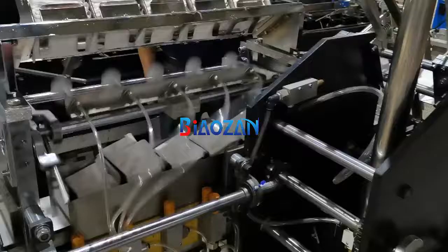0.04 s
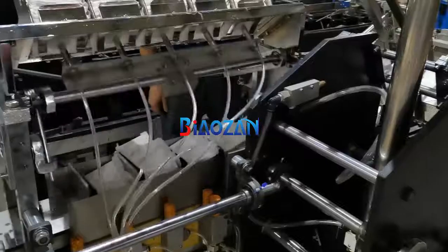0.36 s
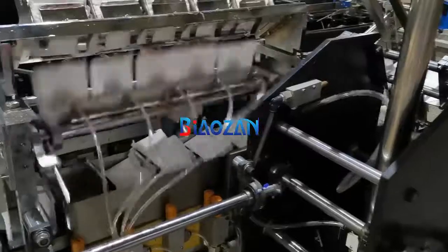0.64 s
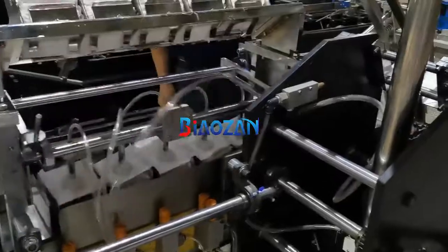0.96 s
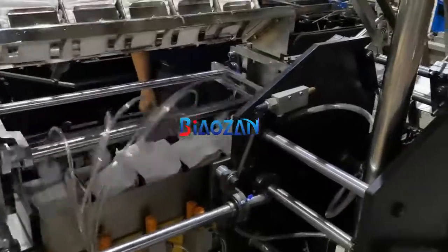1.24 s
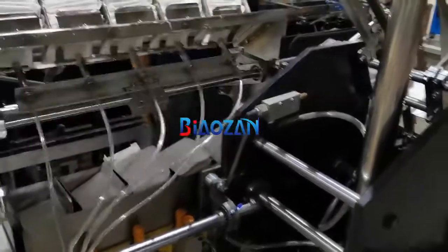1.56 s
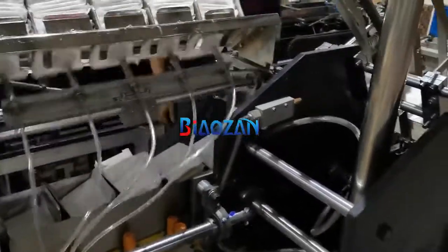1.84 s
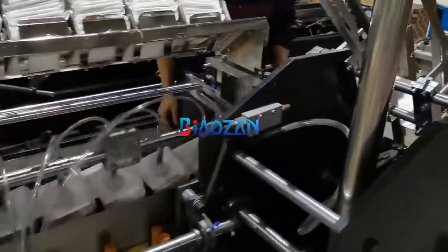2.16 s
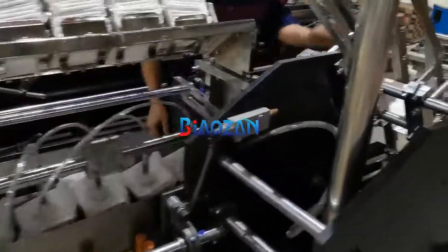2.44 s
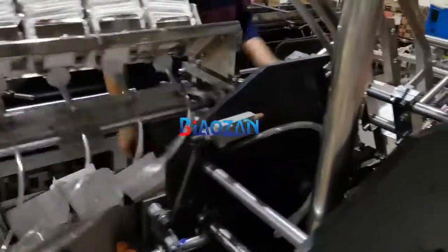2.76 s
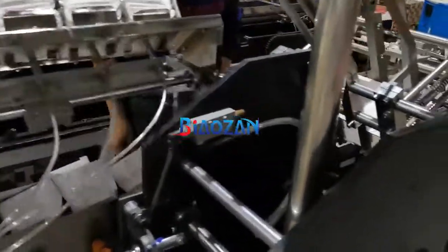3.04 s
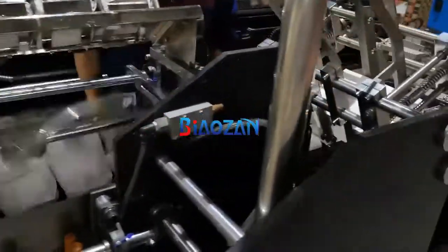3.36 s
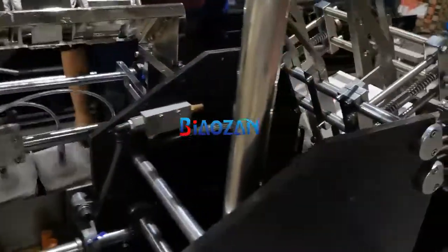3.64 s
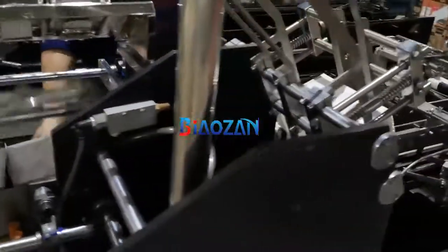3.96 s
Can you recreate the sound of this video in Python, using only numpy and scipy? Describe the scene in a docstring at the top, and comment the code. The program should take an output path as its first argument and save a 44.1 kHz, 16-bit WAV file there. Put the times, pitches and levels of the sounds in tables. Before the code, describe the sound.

A factory machine's air nozzle hisses loudly three times, with knocks and steady rumbling.

```python
"""In a workshop, a machine that packs cartons runs close by. Each time its suction arm grabs, a valve
knocks and a vacuum ejector (a nozzle that makes suction from a jet of air) opens on the right. It spits,
sags, then swells to a ringing hiss over a lower roar. All the while air leaks and the drive rumbles and
clatters. An automatic gain control turns everything down during each burst."""
import sys
import numpy as np
from scipy import signal
from scipy.fft import rfft, irfft
from scipy.io import wavfile
from scipy.ndimage import uniform_filter1d

SR = 44100
rng = np.random.default_rng(int(sys.argv[2]) if len(sys.argv) > 2 else 0)


def store_pcm(level_fs):
    """Save levels as 16-bit WAV."""
    pcm = np.round(np.clip(level_fs, -1, 1) * 32767).astype(np.int16)
    wavfile.write(sys.argv[1], SR, np.atleast_2d(pcm).T)


N = 176400

# Tone colour of each noise: pitch_hz, left_db, right_db
SHOP_SPECTRUM = [(1050, -87, -89.5), (2220, -78, -71.5), (2760, -82, -73.5), (4340, -72, -74),
                 (4760, -78, -68), (5480, -72, -74.5)]
DRIVE_SPECTRUM = [(20, -75, -86), (32.2, -74.5, -73), (48.5, -71, -70), (74.6, -77.5, -77.5),
                  (120, -74, -75.5), (197, -75.5, -74.5), (303, -72.5, -74), (520, -82.5, -74),
                  (667, -85, -78), (890, -85, -75.5), (1260, -82.5, -77.5), (1660, -93, -89)]
LEAK_SPECTRUM = [(6390, -86, -77.5), (7310, -81, -72.5), (8300, -80, -77), (9500, -77, -70),
                 (9900, -86, -70), (10600, -77, -62.5), (11000, -87, -66.5), (11900, -102, -79),
                 (12500, -81, -69.5), (13400, -87, -69.5), (14100, -89, -79), (14800, -90, -78),
                 (15600, -87, -78)]
SPIT_SPECTRUM = [(6850, -80, -79), (8000, -75, -67), (9150, -66, -57), (9900, -76, -64), (11300, -75, -52),
                 (12800, -76, -58.5), (14000, -78, -65)]
JET_SPECTRUM = [(4670, -73, -71.5), (5920, -78.5, -75.5), (6740, -79, -67), (8600, -71, -78),
                (9400, -78, -80), (14550, -80, -67), (17100, -69, -55)]
ROAR_SPECTRUM = [(636, -86, -86.5), (1000, -76, -73.5), (1330, -73, -70), (1680, -75, -72.5),
                 (2310, -69.5, -63.5), (2840, -64, -61), (3360, -67, -66), (3900, -63.5, -64),
                 (4640, -69.5, -70), (5900, -73, -73.5)]
# How alike a noise is in both ears: pitch_hz, likeness_0_to_1
EAR_LIKENESS = [(100, 1), (300, 1), (600, 0.69), (1300, 0.59), (3000, 0.42), (5000, 0.06)]
# Steady ringing in the workshop noise: pitch_hz, width_hz, left_db, right_db
SHOP_RINGS = [(455.6, 11.7, -67.5, -72.5), (907, 59, -72, -72), (3160, 230, -70, -69.5),
              (3770, 400, -72, -75.5)]
# How the leak's hiss rises and falls: time_s, level_db
LEAK_LEVELS = [(.1, 4), (.28, 4.5), (1.25, 2), (1.37, 2.5), (1.409, 4.5), (1.48, 2), (1.65, 2.5),
               (2.49, 1.5), (2.9, 3.5), (3.901, 1.5)]
# Thin whistles of the leak: start_s, end_s, pitch_hz, width_hz, left_db, right_db
LEAK_RINGS = [(.06, .33, 12900, 170, -72, -49.5), (.07, .29, 9720, 200, -76, -60),
              (.07, .29, 10600, 450, -78, -60.5), (.07, .33, 3900, 160, -65, -63.5),
              (1.3, 1.68, 9300, 221, -69, -67), (1.25, 1.68, 12800, 450, -82, -70),
              (2.5, 2.93, 13350, 276, -84, -66), (2.5, 2.87, 3210, 170, -67.5, -65.5)]
# Dull clunks of the swinging arm: start_s, pitch_hz, level_db
ARM_CLUNKS = [(1.529, 417, -30), (1.557, 300, -32.5), (2.68, 686, -36), (3.555, 340, -31), (3.875, 85, -35)]
# Knocks of the valve and arm: start_s, thud_db, clack_db
KNOCK_HITS = [(.295, 2.5, 3.5), (1.178, -2, -3.5), (1.397, 0, 0.5), (1.684, 3, 3), (2.419, -1, -4),
              (2.935, 2.5, 0.5), (3.819, 0, -4)]
# Notes of the struck frame: pitch_hz, level_db, ring_s (time to fade by 60 dB)
FRAME_NOTES = [(60, -39, .05), (117, -24, 0.032), (168, -34, 0.028), (275, -36.5, 0.041), (402, -34, 0.043),
               (624, -34, 0.015), (957, -32, 0.021), (1250, -30.5, 0.0088), (2018, -35.5, 0.019)]
# Hollow notes in the roar that come and go: start_s, end_s, pitch_hz, width_hz, left_db, right_db
ROAR_RINGS = [(.49, 1.17, 2650, 280, -60, -55), (.55, .8, 3610, 450, -61, -59),
              (.8, 1.17, 3100, 380, -58.5, -61), (.6, 1.17, 1020, 150, -67, -64.5),
              (1.81, 2.41, 3290, 450, -60.5, -56), (3.15, 3.5, 3820, 550, -59, -58.5),
              (3.2, 3.8, 2402, 352, -69, -60), (3.24, 3.81, 3080, 520, -58, -57)]
# The nozzle's main and upper ringing: width_hz, left_db, right_db
NOZZLE_SHAPE = (580, -68.5, -48)
UPPER_SHAPE = (1300, -80, -59)
# Bursts of the ejector: open_s, close_s, swell_after_s, level_db, nozzle_hz, nozzle_db,
# upper_hz, upper_db, upper_rise_db_per_s, roar_db, deep_roar_db
EJECTOR_BURSTS = [(0.287, 1.174, 0.22, 7.0, 10740, 0.5, 11750, 2, 1, -0.5, 1.5),
                  (1.678, 2.420, 0.15, 7, 10740, 0, 12250, 1, 5, -0.5, -1),
                  (2.93, 3.816, 0.23, 7.5, 10640, -2.5, 12200, 2, 5, -1, -2.5)]
# Echoes from nearby steel plates: left_delay_s, right_delay_s, gain
PLATE_ECHOES = [(.00205, 0.0022, 0.18), (.00310, 0.0027, 0.3), (.0053, 0.0053, 0.157),
                (.0091, 0.0099, 0.15)]

VALVE_OPEN_S = 0.025  # time the valve takes to open
RIGHT_LAG_S = 0.00018  # some noises reach the right ear this much later


def from_db(db):
    """Turns decibels into a number to multiply by."""
    return 10 ** (np.asarray(db) / 20)


def clock():
    """The time of every sample, in seconds."""
    return np.arange(N) / SR


def bins():
    """The frequency of every point in a spectrum, in Hz."""
    return np.maximum(np.arange(N // 2 + 1) * SR / N, 1)


def curve(hz, values):
    """Joins a few points into a line across all frequencies."""
    return np.interp(np.log(bins()), np.log(hz), values)


def drift(rate_hz):
    """A smooth random wobble, about 1 in size."""
    slow = irfft(rfft(rng.standard_normal(N)) / (1 + (bins() / rate_hz) ** 2), N)
    return slow / slow.std()


def noise(gain, lag_s=0):
    """Stereo noise with a gain for each frequency; the bass is alike in both ears."""
    alike = np.clip(curve(*np.transpose(EAR_LIKENESS)), 0, 1)
    mid, side = rfft(rng.standard_normal((2, N)))
    both = np.sqrt(1 + alike) * mid + np.sqrt(1 - alike) * side * [[1], [-1]]
    delay = np.exp(-2j * np.pi * bins() * lag_s * np.array([[0], [1]]))
    return irfft(both * gain * delay, N) * np.sqrt(SR) / 2


def colour(table, steepness=6):
    """Left and right gains from a spectrum table, falling away past its ends."""
    hz, left, right = np.transpose(table)
    edges = np.minimum(1, np.minimum(bins() / hz[0], hz[-1] / bins())) ** steepness
    return from_db([curve(hz, left), curve(hz, right)]) * edges


def resonance(hz, width_hz, left_db, right_db, skirt_hz):
    """Left and right gains that favour one pitch and fall faster beyond skirt_hz from it."""
    off_hz = bins() - hz
    falloff = (1 + (2 * off_hz / width_hz) ** 2) * (1 + (off_hz / skirt_hz) ** 2)
    return from_db([[left_db], [right_db]]) / np.sqrt(falloff)


def ring(clicks, hz, ring_s):
    """Each click starts a fading tone, like a tap on metal."""
    decay, step = np.exp(-np.log(1000) / (ring_s * SR)), 2 * np.pi * hz / SR
    return signal.lfilter([0, np.sin(step)], [1, -2 * decay * np.cos(step), decay ** 2], clicks + 1e-18)


def shifted(sound, hz):
    """Slides a sound up or down by a changing number of Hz."""
    return np.real(signal.hilbert(sound) * np.exp(2j * np.pi * np.cumsum(hz) / SR))


def passing_rings(table, fade_s, skirt_hz):
    """Breathy notes blown by the air, each fading in, holding and fading out."""
    t, out = clock(), 0
    for start_s, end_s, *shape in table:
        fade = (np.tanh((t - start_s) / fade_s) - np.tanh((t - end_s) / fade_s)) / 2
        out += fade * noise(resonance(*shape, skirt_hz), RIGHT_LAG_S)
    return out


def shop(flutter_db=0.64):
    """The workshop's machinery makes a steady rush with a few ringing pitches."""
    rings = sum(resonance(*row, skirt_hz=500) ** 2 for row in SHOP_RINGS)
    power = colour(SHOP_SPECTRUM, steepness=16) ** 2 + rings
    return noise(np.sqrt(power), RIGHT_LAG_S) * from_db(flutter_db * drift(9.1))


def drive(level_db=0.5, flutter_db=1.8):
    """The machine's drive rumbles unevenly."""
    return noise(colour(DRIVE_SPECTRUM)) * from_db(level_db + flutter_db * drift(22))


def leak(flutter_db=1.25):
    """Leaking air hisses all the time, with thin whistles that come and go."""
    level_db = np.interp(clock(), *np.transpose(LEAK_LEVELS))
    hiss = noise(colour(LEAK_SPECTRUM, steepness=20)) * from_db(level_db)
    whistles = passing_rings(LEAK_RINGS, fade_s=0.038, skirt_hz=400)
    return (hiss + whistles) * from_db(flutter_db * drift(8.2))


def clunks(ring_s=0.066, contact_s=0.0022):
    """Soft bumps of the arm each ring briefly at one low pitch."""
    out = 0
    for start_s, hz, level_db in ARM_CLUNKS:
        age = np.maximum(clock() - start_s, 0)
        rise = 1 - np.exp(-age / contact_s)
        out += from_db(level_db - 60 * age / ring_s) * rise * np.sin(2 * np.pi * hz * age)
    return out


def heave(push_db=-29, push_s=0.0024):
    """Each knock moves the frame, which pushes the air once, out and back."""
    out = 0
    for start_s, thud_db, _ in KNOCK_HITS:
        swing = (clock() - start_s) / push_s - 1
        out -= from_db(push_db + thud_db) * swing * np.exp(-swing ** 2 / 2)
    return out


def frame(taps_per_s=46, tap_db=-27, spread_db=4, rattle_s=0.0085, thud_below_hz=300):
    """Rattling knocks and a clatter of light, random taps make the machine's frame ring."""
    age = np.arange(SR // 20) / SR
    taps = rng.random(N) < taps_per_s / SR
    clatter = taps * from_db(tap_db + spread_db * np.clip(rng.standard_normal(N), -2, 2))
    out = 0
    for k, (hz, note_db, ring_s) in enumerate(FRAME_NOTES):
        is_thud = hz < thud_below_hz
        rattle, pan_db = (0.01, 0) if is_thud else (0.09, 1.5)  # clacks rattle more and lean right
        force = clatter * rng.standard_normal(N)
        for start_s, thud_db, clack_db in KNOCK_HITS:
            blow = (age == 0) + rattle * np.exp(-age / rattle_s) * rng.standard_normal(len(age))
            start = int(start_s * SR)
            force[start:start + len(age)] += from_db(thud_db if is_thud else clack_db) * blow
        pan = from_db([[-pan_db], [pan_db]])
        out += (-1) ** k * from_db(note_db) * pan * ring(force, hz, ring_s)
    return out


def whistle(peak_s=2.1425, width_s=0.004, pitch_hz=10640):
    """The nozzle locks into one pure tone for an instant, on the right."""
    shape = np.exp(-((clock() - peak_s) / width_s) ** 2)
    return shape * np.sin(2 * np.pi * pitch_hz * clock()) * from_db([[-20.5], [0]])


def gust(start_s, decay_s):
    """The strength of stored air that rushes out of a valve and dies away."""
    age = np.maximum(clock() - start_s, 0)
    return np.minimum(age / VALVE_OPEN_S, 1) * np.exp(-age / decay_s)


def flow(open_s, close_s, swell_after_s, blast_db, sag_db, blast_s=0.063, swell_s=0.044, stop_s=0.02):
    """The air flow of one burst: a blast, a sag, a swell to full strength, a quick stop."""
    age = np.maximum(clock() - open_s, 0)
    valve = np.minimum(age / VALVE_OPEN_S, 1) * np.exp(-np.maximum(clock() - close_s, 0) / stop_s)
    blast = from_db(blast_db) * np.exp(-age / blast_s)
    swell = 0.5 + 0.5 * np.tanh((age - swell_after_s) / swell_s)
    return valve * (blast + from_db(sag_db) * (1 - swell) + swell)


def ejector(waver_hz=69.4, nozzle_flutter_db=0.53, flutter_db=0.46, deep_hz=2400, deepen_db_per_s=4.5):
    """Air spits from the nozzle; then a bright jet, two ringing pitches and a roar follow the flow."""
    waver = waver_hz * drift(24.36)
    nozzle_flutter = from_db(nozzle_flutter_db * drift(45))
    spit = from_db(1.5) * noise(colour(SPIT_SPECTRUM))
    jet = from_db(-0.5) * noise(colour(JET_SPECTRUM))
    roar = from_db(-0.5) * noise(colour(ROAR_SPECTRUM), RIGHT_LAG_S)
    deep = irfft(rfft(roar) / (1 + (bins() / deep_hz) ** 4), N)  # the low part of the roar
    out = from_db(1) * jet * gust(start_s=0.91, decay_s=0.035)  # a puff as the arm turns back
    for (open_s, close_s, swell_after_s, level_db, nozzle_hz, nozzle_db,
         upper_hz, upper_db, upper_rise, roar_db, deep_db) in EJECTOR_BURSTS:
        timing = open_s, close_s, swell_after_s
        # The upper ringing and the deep roar grow through the burst.
        from_middle_s = np.clip(clock(), open_s, close_s) - (open_s + swell_after_s + close_s) / 2
        nozzle = noise(resonance(nozzle_hz, *NOZZLE_SHAPE, skirt_hz=930))
        nozzle = from_db(nozzle_db) * nozzle_flutter * shifted(nozzle, waver)
        upper = noise(resonance(upper_hz, *UPPER_SHAPE, skirt_hz=930))
        upper *= from_db(upper_db + upper_rise * from_middle_s)
        deep_gain = from_db(deep_db + deepen_db_per_s * from_middle_s)
        burst_roar = from_db(roar_db) * (roar + deep * (deep_gain - 1))
        hiss = (jet * flow(*timing, blast_db=0.5, sag_db=-4)
                + nozzle * flow(*timing, blast_db=-3.5, sag_db=-8)
                + upper * flow(*timing, blast_db=2, sag_db=-12)
                + burst_roar * flow(*timing, blast_db=-1.5, sag_db=-7))
        out += from_db(level_db) * (hiss + spit * gust(open_s, decay_s=0.08))
    hollow_notes = passing_rings(ROAR_RINGS, fade_s=0.03, skirt_hz=450)
    return (out + hollow_notes) * from_db(flutter_db * drift(21.5))


def plates(sound, dull_hz=4550):
    """Quick, dull echoes from steel plates boost some pitches and weaken others."""
    echoes = sum(gain * np.exp(-2j * np.pi * bins() * np.array([[left_s], [right_s]]))
                 for left_s, right_s, gain in PLATE_ECHOES)
    return irfft(rfft(sound) * (1 + echoes / (1 + (bins() / dull_hz) ** 2)), N)


def room(sound, ring_s=1, delay_s=0.017, band_hz=(300, 4230)):
    """The workshop's many echoes blur into a dull, fading tail."""
    age = np.arange(SR) / SR
    tail = rng.standard_normal((2, SR)) * from_db(-60 * age / ring_s) * (age > delay_s)
    tail /= np.sqrt(np.sum(tail ** 2, axis=1, keepdims=True))
    tail = signal.sosfilt(signal.butter(2, band_hz, "band", fs=SR, output="sos"), tail)
    return from_db(-10.5) * signal.fftconvolve(sound, tail, axes=1)[:, :N]


def scene():
    """Adds up the air, the knocks, the background and their echoes."""
    air = ejector() + whistle()
    knocks = frame() + clunks()
    return plates(air + leak() + shop()) + drive() + knocks + heave() + room(air + knocks)


def record(dry, start_s=0.07, threshold_db=-28, slope=0.45, attack_s=0.013, release_db_per_s=40):
    """Gain control turns loud moments down fast and recovers slowly; the highest treble is cut."""
    t = clock()
    sound = dry * np.clip((t - start_s) / 0.0056, 0, 1)  # silence, then a quick fade in
    power = uniform_filter1d(np.mean(sound ** 2, axis=0), size=441)
    level_db = 10 * np.log10(np.maximum(power, 1e-12))
    cut_db = slope * np.maximum(level_db - threshold_db, 0)
    cut_db = np.maximum.accumulate(cut_db + release_db_per_s * t) - release_db_per_s * t
    smoothing = np.exp(-1 / (attack_s * SR))
    sound *= from_db(-signal.lfilter([1 - smoothing], [1, -smoothing], cut_db))
    treble_cut = np.clip((15850 - bins()) / 200 + 0.5, 0, 1)
    return irfft(rfft(sound) * treble_cut, N)


dry = scene()
out = record(dry)
store_pcm(out)
```